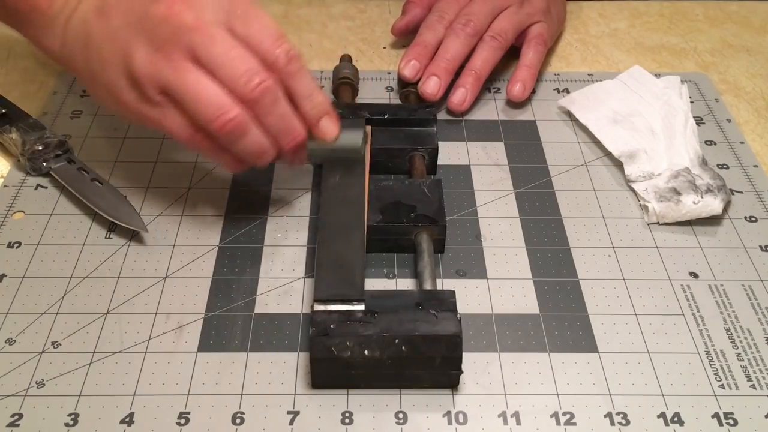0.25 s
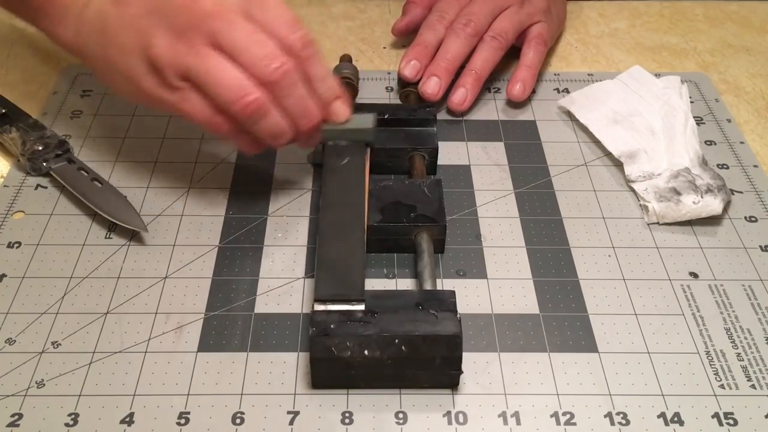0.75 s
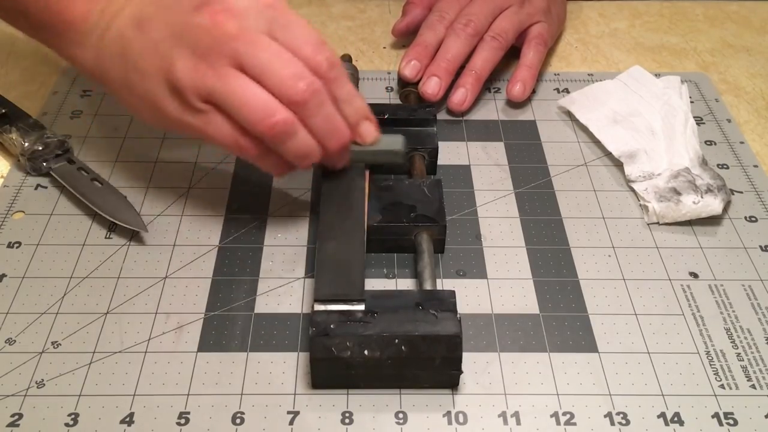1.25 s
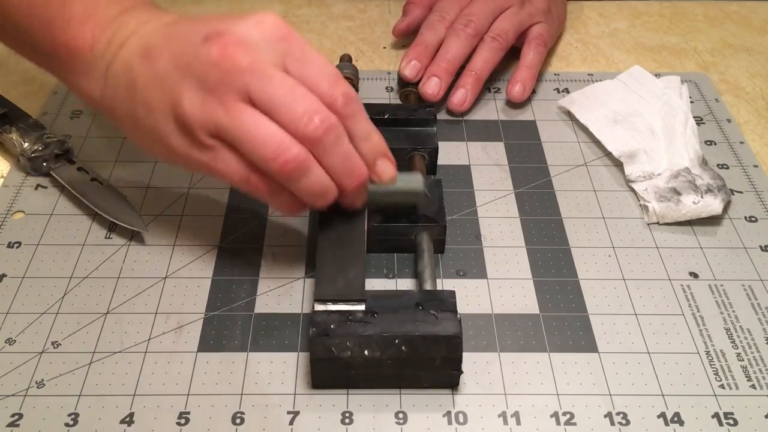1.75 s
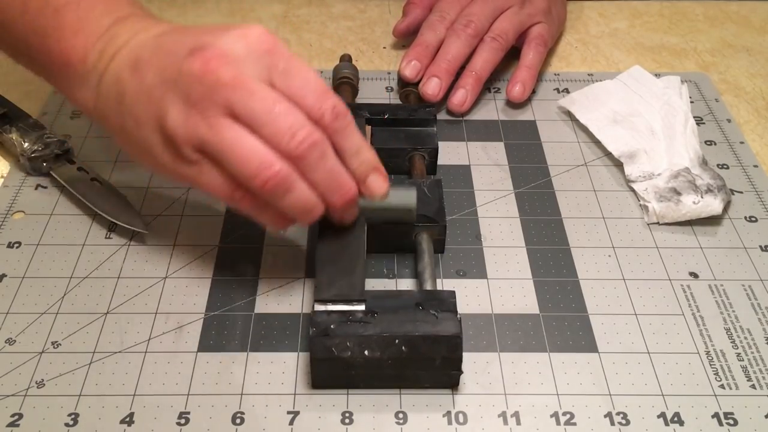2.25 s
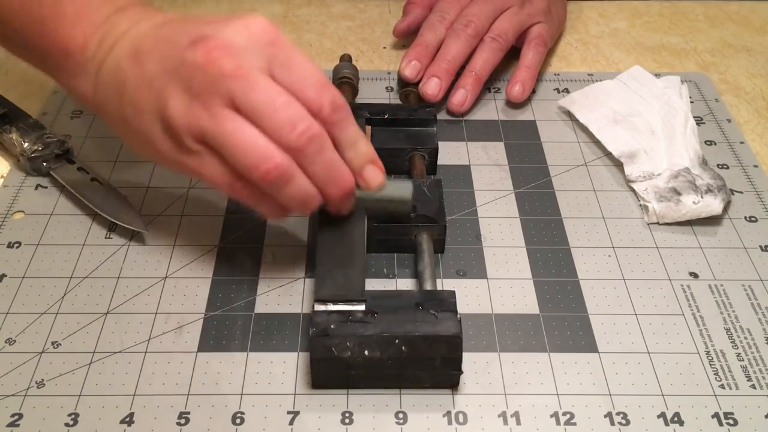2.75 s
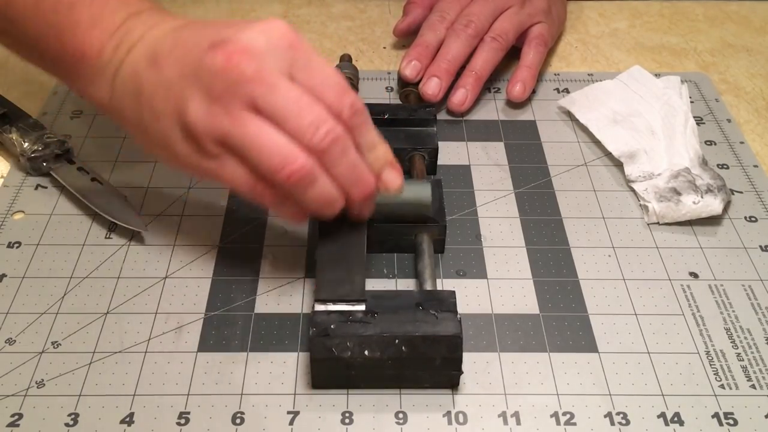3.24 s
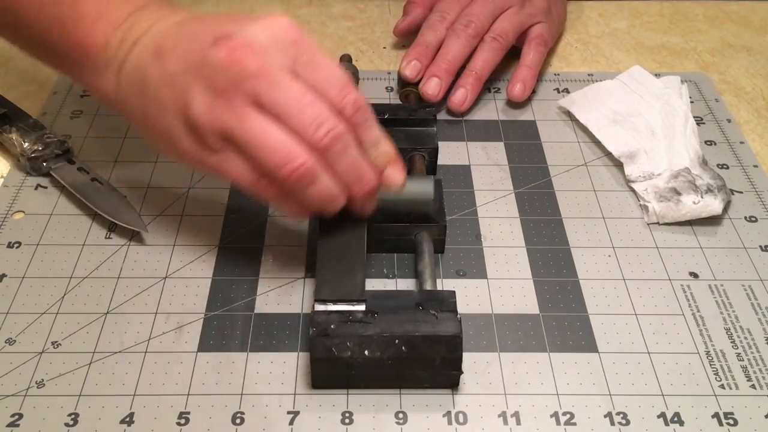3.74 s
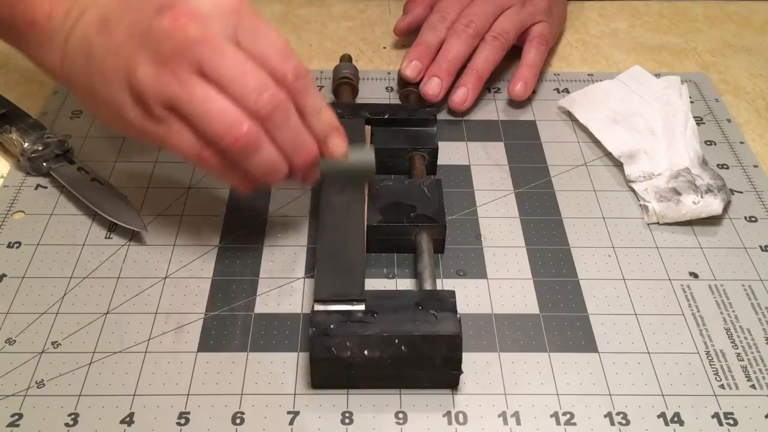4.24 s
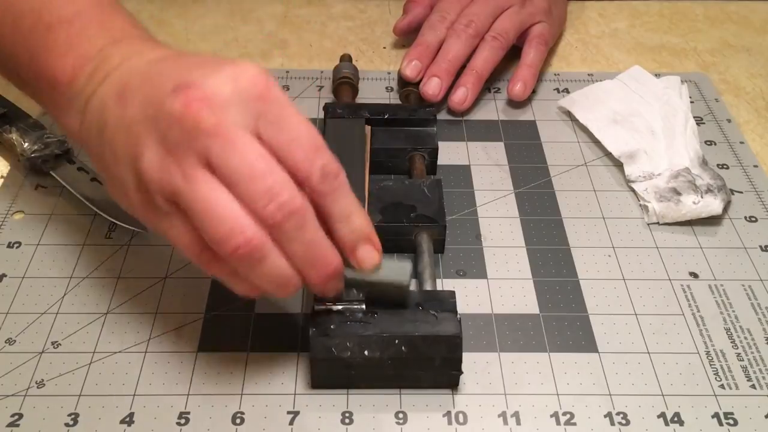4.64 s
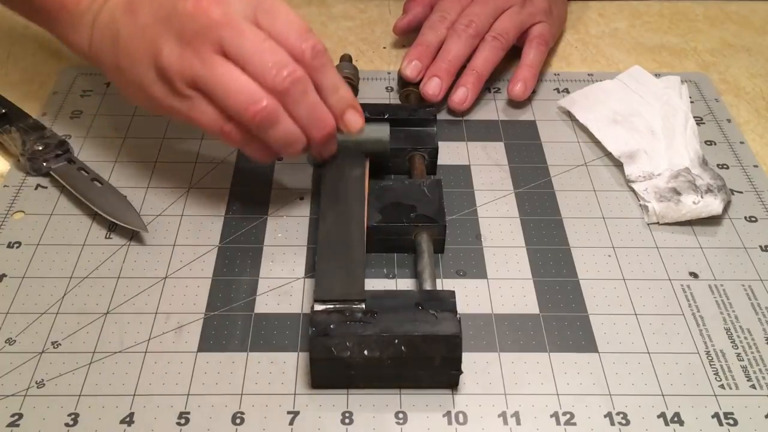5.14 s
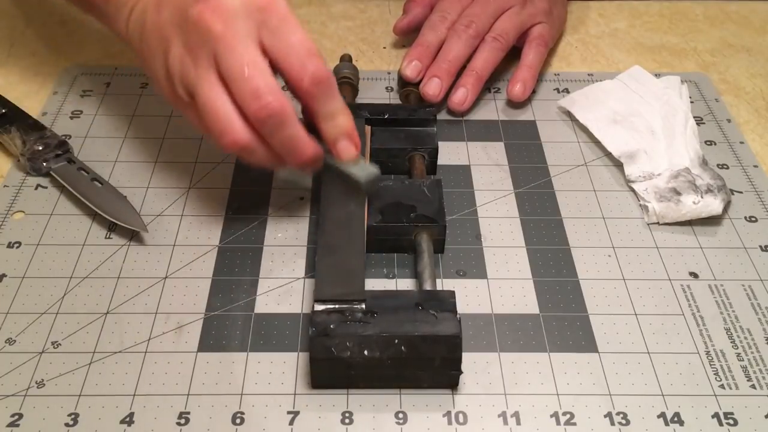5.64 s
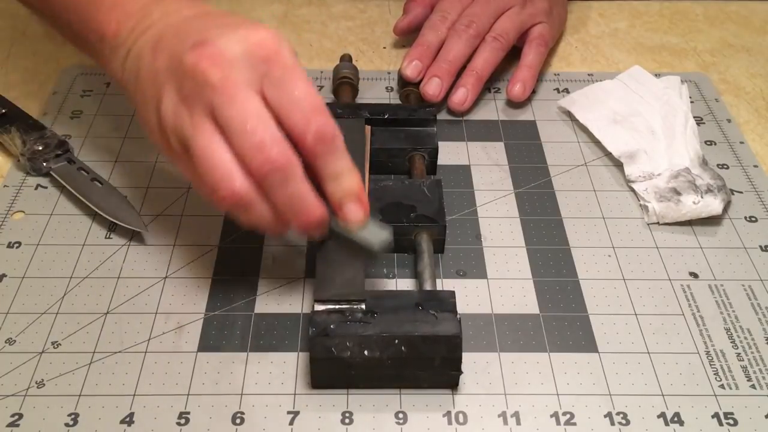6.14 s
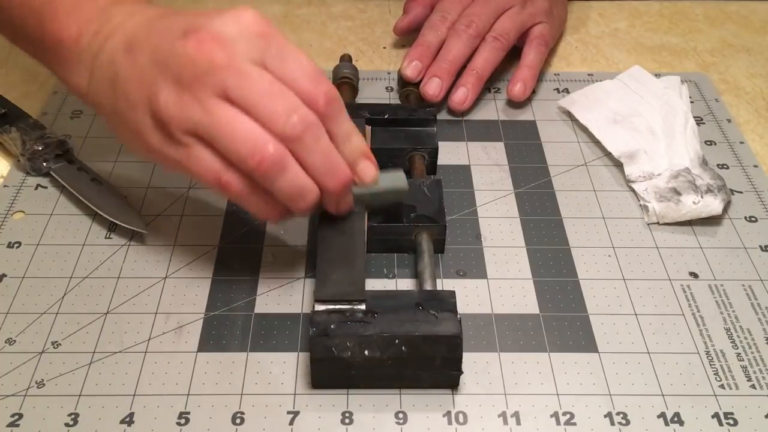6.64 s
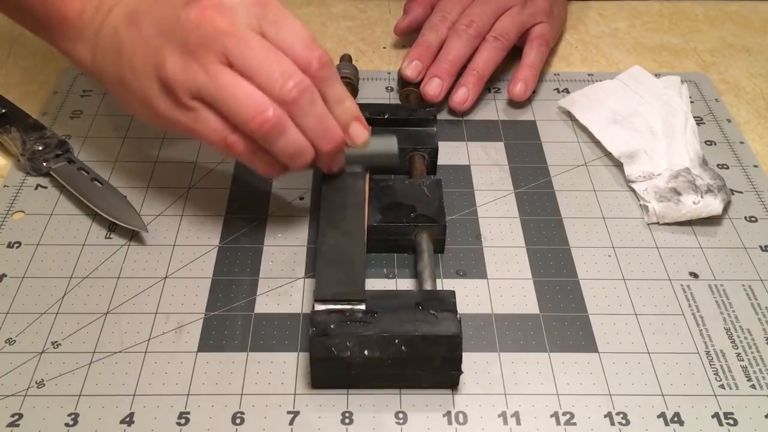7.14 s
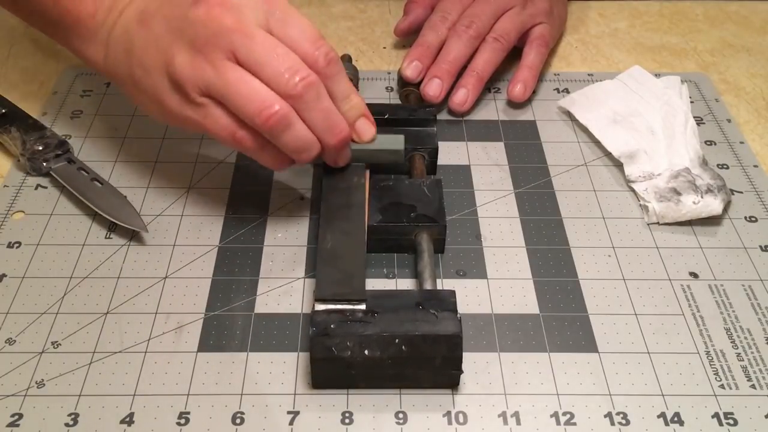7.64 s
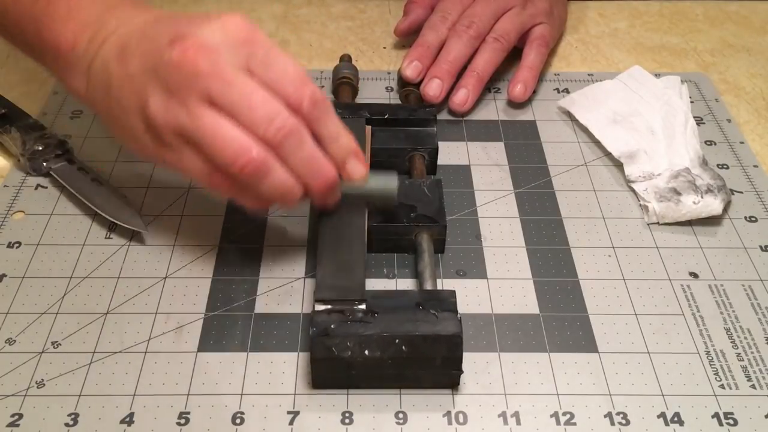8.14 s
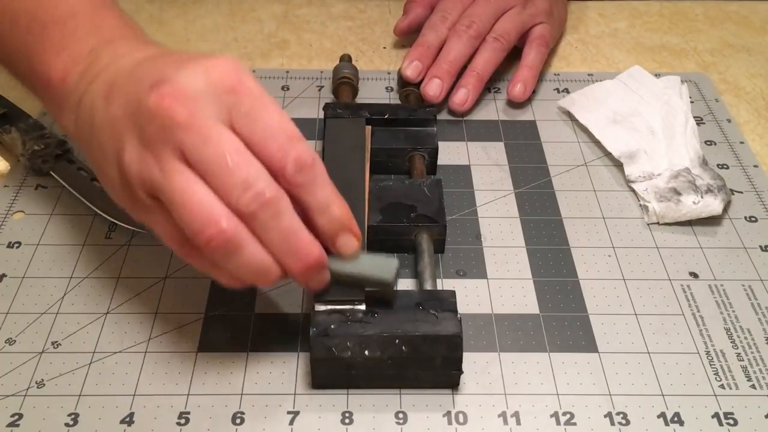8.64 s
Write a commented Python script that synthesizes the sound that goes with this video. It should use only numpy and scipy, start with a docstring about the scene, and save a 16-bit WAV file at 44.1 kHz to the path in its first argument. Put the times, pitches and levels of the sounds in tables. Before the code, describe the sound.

A small abrasive block scrubs a diamond sharpening stone clamped in a vise, a close, gritty hiss that runs for about nine seconds. For the first four seconds it circles in smooth, swelling strokes, about four a second, with a soft low shudder, a light tap at 0.4 seconds and a few faint swishes. From about 4.5 seconds it saws straight back and forth, around seven strokes a second, the rasp breaking briefly at each turn while the vise jolts and rumbles. Dull thuds on the desk come near 5.8 and 6.4 seconds, and the scrubbing grows slightly louder. From 7.3 seconds the block's edge digs in with short falling swishes. A sharp knock lands at 7.4 seconds, a softer one at 8.5 and the sharpest at 8.7, each with a low thud from the vise. Faint air of a small room lies underneath.

```python
"""A gritty, hissing scrub, stroke after stroke: a small abrasive block works over a diamond stone.
Breaking grains ring the block, the stone and the vise that holds it on a desk. The hand circles at
first, with a soft shudder, then saws straight to and fro, so the rasp stops and the vise jolts at
every turn. Now and then an edge digs in and swishes. Late on the block catches the end of the stone
and knocks, and the vise thuds on the desk. A small room and its faint air sit behind it all."""
import sys
import numpy as np
from scipy import signal
from scipy.fft import rfft, irfft, next_fast_len
from scipy.io import wavfile
from scipy.ndimage import uniform_filter1d

SR = 44100
rng = np.random.default_rng(int(sys.argv[2]) if len(sys.argv) > 2 else 0)


def generate_wav(sig):
    """Save sig (samples, or channels by samples) to the path in sys.argv[1] as 16-bit PCM at SR."""
    pcm = np.round(np.clip(np.atleast_2d(sig).T, -1, 1) * 32767).astype(np.int16)
    wavfile.write(sys.argv[1], SR, pcm)


N = 392034
TIME = np.arange(N) / SR


def scrubbing():
    """Grains break under the moving block: hiss, rasp and grating on top, the vise rumbling below."""
    judder = wander(rate_hz=65)  # the block skips on the grit, in all bands at once
    tremor = wander(rate_hz=14.5)  # the grip is never quite even
    contact = hiss(judder, tremor) + rasp(judder, tremor) + grating(judder)
    return travelling_contact(contact) + rumble(judder)


# tone of the finest grains: (frequency [Hz], level [dB])
HISS_SPECTRUM = [(1500, -37), (4000, -7), (5700, -5.5), (6600, -0.5), (8600, 0), (9400, 0), (11500, -2),
                 (13800, -8), (15800, -21)]
# long, fast sweeps brighten the hiss: (time [s], fizz lift [dB])
SWEEP_BRIGHTNESS = [(1.1, 3.5), (1.5, 3.5), (2.8, 7.5), (4.3, 4.5), (5.1, 4.5), (6.1, 8), (6.8, 1),
                    (7.3, -1.5), (7.7, -3), (8.2, 5), (8.6, 3.5)]

def hiss(judder, tremor, sag_db=3, trim_db=-1.77):
    """A dense spray of fine fractures that swells with hand speed and ducks as the hand turns."""
    sweep_db, = curves(SWEEP_BRIGHTNESS)
    _, dip_db = turns()
    stroke_db, bite_db = pressure(), bites()
    spray = grit(HISS_SPECTRUM, per_s=16000, spread_db=1.5, judder_db=0.36 * judder + 1.38 * tremor)
    spray *= gain_of(stroke_db + bite_db - 0.97 * dip_db - sag_db * (1 - hand_speed()) + trim_db)
    # a firm, fast stroke throws off more of the finest fizz
    fizz = signal.sosfiltfilt(signal.butter(2, 10000, "high", fs=SR, output="sos"), spray)
    fizz_db = 0.095 * (stroke_db - stroke_db.mean()) - 0.18 * dip_db + sweep_db + 0.36 * bite_db
    return spray + fizz * (gain_of(fizz_db) - 1)


# tone of the block's face on the stone: (frequency [Hz], level [dB])
RASP_SPECTRUM = [(900, -43), (2000, -3.5), (2900, -2.5), (3500, 5), (4400, 5), (5100, -3), (7000, -18.5),
                 (15000, -10.5)]
# the face rasps most when flat on the middle of the stone: (time [s], rasp gain [dB])
FACE_CONTACT = [(1.2, -12.5), (1.7, -10), (3.2, -9), (3.8, -12.5), (8.8, -12)]

def rasp(judder, tremor, slow_hz=3200, fast_hz=4300, sag_db=2, trim_db=0.08):
    """The face rasps over the grains; the faster they pass, the higher it sings."""
    face_db, = curves(FACE_CONTACT)
    turning, dip_db = turns()
    speed = hand_speed()
    grains = grit(RASP_SPECTRUM, per_s=7000, spread_db=1.0, judder_db=0.32 * judder + 0.41 * tremor)
    song = resonate(rng.standard_normal(N), slow_hz + (fast_hz - slow_hz) * speed ** 2, width_hz=840)
    song *= gain_of(-7.5 + 1.76 * (face_db - face_db.mean()))  # clearest when the face lies flat
    duck_db = 0.81 * dip_db + 4.6 * turning + sag_db * (1 - speed)
    return (grains + song) * gain_of(pressure() + face_db - duck_db + trim_db)


# tone of the block's edge on the stone: (frequency [Hz], level [dB])
GRATE_SPECTRUM = [(150, -1), (400, -2.5), (800, -0.5), (2100, 3.5), (2800, 3), (4000, -3), (10000, -11)]

def grating(judder, edge_db=-19, drag_db=-3, slow_lift_db=2, turn_duck_db=5):
    """The edge grates coarsely, more when it drags or moves slowly, and ducks at the turn itself."""
    turning, _ = turns()
    flicker_db = 0.4 * judder + 1.85 * wander(rate_hz=16)
    grains = grit(GRATE_SPECTRUM, per_s=3500, spread_db=1.5, judder_db=flicker_db)
    level = np.hypot(gain_of(pressure() + edge_db), gain_of(drag_db) * dragging())
    return grains * level * gain_of(slow_lift_db * (1 - hand_speed()) - turn_duck_db * turning)


def grit(spectrum, per_s, spread_db, judder_db):
    """Tiny fractures of abrasive grains, of uneven size and bunched by the judder, ring the body."""
    hits = rng.random(N) < per_s / SR
    sizes = gain_of(judder_db + spread_db * np.minimum(rng.exponential(1, N), 4))
    return unit_rms(body(hits * sizes * rng.choice([-1, 1], N), spectrum))


# resonances of vise, block, stone and holder: (frequency [Hz], width [Hz], lift [dB])
BODY_RESONANCES = [(111, 30, 0), (297, 32, 5.5), (394, 39, 8), (694, 86, 8.5), (1178, 183, 7),
                   (1487, 22, 8.5), (2310, 710, 6.5), (4500, 690, 3), (5260, 130, 5), (6850, 1800, 7.5),
                   (7600, 150, 4), (8090, 310, 5.5), (8490, 800, 7), (10470, 220, -5.5), (14900, 260, 13.5)]

def body(force, spectrum, size=4096):
    """Colours a force by its spectrum and lets the resonances ring after it."""
    hz = abs(np.fft.fftfreq(size, 1 / SR))
    peaks_db = sum(lift / (1 + (2 * (hz - f) / width) ** 2) for f, width, lift in BODY_RESONANCES)
    log_gain = np.log(gain_of(value_at(spectrum, hz) + peaks_db))
    response = np.fft.ifft(np.exp(np.conj(signal.hilbert(log_gain)))).real  # minimum phase
    return signal.oaconvolve(force, response[:size // 2])[:len(force)]


def travelling_contact(x, depth_db=3.0, patch_bins=4, patch_frames=20):
    """As the contact point travels, it feeds now some resonances, now others."""
    bands = signal.stft(x, nperseg=256, noverlap=192)[2]
    patches = uniform_filter1d(rng.standard_normal(bands.shape), patch_bins, axis=0)
    patches = uniform_filter1d(patches, patch_frames, axis=1)
    return signal.istft(bands * gain_of(depth_db * unit_rms(patches)), nperseg=256, noverlap=192)[1][:N]


# one push or pull of the block, lasting until the next: (start [s], level [dB])
HAND_STROKES = [(0.0, -34.5), (0.2, -35.5), (0.371, -35), (0.663, -38), (0.81, -35), (0.991, -38),
                (1.192, -37), (1.4, -36.5), (1.6, -36.0), (1.846, -37.5), (2.11, -38), (2.363, -37.5),
                (2.615, -39), (2.858, -38), (3.101, -37.5), (3.36, -36.5), (3.588, -35.5), (3.869, -36),
                (4.134, -33), (4.298, -36.5), (4.469, -37), (4.627, -34.5), (4.785, -36), (4.934, -35),
                (5.091, -35.0), (5.239, -35.5), (5.389, -36), (5.534, -34.5), (5.671, -35), (5.806, -35),
                (5.941, -35.5), (6.082, -35.5), (6.227, -34.5), (6.375, -34.5), (6.518, -36), (6.664, -33),
                (6.79, -32), (6.924, -33.5), (7.053, -33.5), (7.183, -33.5), (7.304, -34), (7.42, -33),
                (7.542, -34.5), (7.663, -34), (7.778, -33), (7.907, -35), (8.162, -33.5), (8.338, -36.5),
                (8.523, -34), (8.672, -36), (8.815, -32.5)]

def pressure(fade_db_per_s=7, ease_s=0.045):
    """The scrub's level in dB: the hand eases off through each stroke and blends into the next."""
    starts, db = np.transpose(HAND_STROKES)
    stroke = np.maximum(np.searchsorted(starts, TIME, "right") - 1, 0)
    age = TIME - starts[stroke]
    return uniform_filter1d(db[stroke] - fade_db_per_s * (age - age.mean()), round(ease_s * SR))


def hand_speed():
    """The swing of the hand: 0 at each turn, 1 at mid-stroke."""
    starts = np.sort([s for s, _ in HAND_STROKES])
    return abs(np.sin(np.pi * np.interp(TIME, starts, np.arange(len(starts)))))


# turns get deeper and quicker as circling becomes sawing: (time [s], depth [dB], half duration [s])
TURN_SHAPES = [(1.0, -1.5, 0.026), (2.6, 0.5, 0.017), (3.2, 2.5, 0.045), (4.1, 2.5, 0.017),
               (4.6, 12, 0.0033), (4.8, 14, 0.0092), (6.6, 21, 0.006), (7.15, 8.5, 0.016), (7.3, 22, .014),
               (7.8, 32, 0.013), (8.2, 15, 0.016), (8.8, 23, 0.018)]

def turns(lean=0.13):
    """The hand reverses: how far it is into a turn (0-1), and the dip in dB that drives the ducking."""
    turning, dip_db = np.zeros(N), np.zeros(N)
    when, depths_db, halves_s = np.transpose(TURN_SHAPES)
    for s, _ in HAND_STROKES:
        half_s = np.interp(s, when, halves_s)
        near = abs(TIME - s) < .5
        # the block coasts to a stop and bites again more quickly
        since = TIME[near] - s - lean * half_s / 2
        width_s = half_s * np.exp(-lean * np.sign(since))
        bell = np.exp(-(since / width_s) ** 2)
        turning[near] += bell
        dip_db[near] += np.interp(s, when, depths_db) * bell
    return turning, dip_db


# flares in the hiss: (start [s], length [s], lift [dB])
HARD_BITES = [(4.018, 0.089, 3.5), (6.84, 0.067, 1.5), (7.366, 0.029, 7), (8.553, 0.076, 2.5)]

def bites():
    """The block bites harder for a moment, lifting and brightening the hiss; in dB."""
    lift_db = np.zeros(N)
    for s, length, db in HARD_BITES:
        add(lift_db, s, db * drag_shape(round(length * SR)))
    return lift_db


# an edge digs in and drags: (start [s], length [s], level [dB], start pitch [Hz], end pitch [Hz])
EDGE_DRAGS = [(0.03, 0.098, -50, 4400, 3470), (0.48, 0.16, -52, 4170, 2400),
              (1.009, .12, -49.5, 3750, 1390), (1.031, 0.14, -54, 520, 400),
              (6.905, 0.029, -50.5, 746, 500), (7.31, 0.088, -43, 2550, 1280),
              (7.551, 0.11, -46.5, 2900, 1960), (7.785, 0.11, -46, 2640, 1740),
              (7.396, 0.025, -41.5, 715, 557), (8.498, 0.024, -42.5, 776, 547),
              (8.545, 0.093, -44.5, 4020, 2450), (8.689, 0.18, -51, 2600, 2100)]

def swishes():
    """A dragging edge rasps in one band, which sinks as it slows."""
    out = np.zeros(N)
    for s, length, db, start_hz, end_hz in EDGE_DRAGS:
        count = round(length * SR)
        glide_hz = np.geomspace(start_hz, end_hz, count)
        band = resonate(rng.standard_normal(count), glide_hz, width_hz=420 + 0.45 * end_hz)
        add(out, s, gain_of(db) * band * drag_shape(count))
    return out


def dragging():
    """How hard an edge is digging in, as an amplitude."""
    out = np.zeros(N)
    for s, length, db, _, _ in EDGE_DRAGS:
        add(out, s, gain_of(db) * drag_shape(round(length * SR)))
    return out


def drag_shape(count, attack=0.073, release=0.31):
    """A drag bites fast and lets go slowly; attack and release are shares of its length."""
    along = np.linspace(0, 1, count)
    return np.minimum(1, np.minimum(along / attack, (1 - along) / release))


# the block strikes the holder: (time [s], peak [dB], hardness as a low-pass corner [Hz])
BLOCK_KNOCKS = [(.388, -27.5, 3000), (7.396, -15.5, 3530), (8.497, -21, 1350), (8.6909, -13, 4280)]
# tone of a knock: (frequency [Hz], level [dB])
CLACK_SPECTRUM = [(60, -22), (350, 4), (800, -9.5), (2050, -2.5), (2900, -6.5), (3900, 1), (16000, -25)]

def knocks(chatter_s=0.0062, chatter_gain=0.12):
    """A sharp blow and a few milliseconds of chatter; a soft blow has less treble."""
    out, t = np.zeros(N), np.arange(SR // 8) / SR
    for s, db, corner_hz in BLOCK_KNOCKS:
        blow = 2 * (t == 0)
        chatter = chatter_gain * rng.standard_normal(len(t)) * np.exp(-t / chatter_s)
        force = signal.sosfilt(signal.butter(2, corner_hz, fs=SR, output="sos"), blow + chatter)
        clack = body(force, CLACK_SPECTRUM)
        add(out, s, gain_of(db) * clack / abs(clack).max())
    return out


# the vise rocks on the desk: (time [s], peak [dB], pitch [ratio])
VISE_THUDS = [(5.824, -30, 0.7), (6.385, -32.5, 0.97), (6.93, -37, 1.1), (7.37, -31, 0.97),
              (7.395, -20.5, 1.077), (7.875, -29, 1.076), (7.925, -32, 1), (8.504, -27.5, 0.89),
              (8.561, -26.5, 1.05), (8.652, -33, 1.2), (8.697, -23.5, 1)]
# modes of the vise on the desk: (frequency [Hz], level [dB], t60 [s])
VISE_MODES = [(66.6, -18, 0.32), (114.4, 8, 0.069), (162.3, -3, 0.14), (286, 0, 0.09), (380, 1.5, 0.051)]

def thuds(rise_s=0.0018, jolt_pitch=0.707):
    """The heavy vise answers each rock or jolt with a few damped low modes."""
    out, t = np.zeros(N), np.arange(SR // 4) / SR
    for s, db, pitch in VISE_THUDS + [(s, db, jolt_pitch) for s, db in jolts()]:
        ring = sum(gain_of(mode_db - 60 * t / t60) * np.sin(2 * np.pi * hz * pitch * t)
                   for hz, mode_db, t60 in VISE_MODES)
        ring *= 1 - np.exp(-t / rise_s)
        add(out, s, gain_of(db) * ring / abs(ring).max())
    return out


# weight of the jolt that starts a push: (time [s], peak [dB])
JOLT_LEVELS = [(4.6, -47), (4.78, -37.5), (6.5, -36), (7.002, -45), (8.8, -40.5)]

def jolts(pull_db=-5.5):
    """Each straight turn jolts the vise, a pull less than a push; gives (time [s], peak [dB])."""
    when, db = np.transpose(JOLT_LEVELS)
    return [(s, np.interp(s, when, db) + pull_db * (k % 2))
            for k, (s, _) in enumerate(HAND_STROKES) if s > when[0]]


# deep tone of the jolted vise: (frequency [Hz], level [dB])
SHAKE_SPECTRUM = [(25, -13), (52, 10), (80, 0.5), (155, -1), (230, -15.5), (400, -18.5), (600, -28.5),
                  (4000, -55)]

def shaking(rise_s=0.015, decay_s=0.023, trim_db=-3.5):
    """After each jolt the vise shakes and settles."""
    level, t = np.zeros(N), np.arange(SR // 3) / SR
    swell = (1 - np.exp(-t / rise_s)) * np.exp(-t / decay_s)
    for s, db in jolts():
        add(level, s, gain_of(db + trim_db) * swell / swell.max())
    return level * grit(SHAKE_SPECTRUM, per_s=1500, spread_db=1.0, judder_db=0)


# tone of the vise's steady rumble: (frequency [Hz], level [dB])
RUMBLE_SPECTRUM = [(28, -31), (52, 4.5), (95, 1), (160, 0), (205, -9), (290, -6), (400, -11), (520, -24),
                   (4000, -45.5)]

def rumble(judder, scrub_db=-18.5, drag_db=-1, sag_db=0.5):
    """The vise rumbles in step with the strokes, and harder under a dragging edge."""
    grains = grit(RUMBLE_SPECTRUM, per_s=1500, spread_db=2.0, judder_db=0.24 * judder)
    steady = gain_of(pressure() + scrub_db - sag_db * (1 - hand_speed()))
    return grains * np.hypot(steady, gain_of(drag_db) * dragging())


# the block shudders in the fingers, mostly while circling: (time [s], mid-stroke level [dB])
SHUDDER_LEVELS = [(1.2, -57), (1.75, -50), (2.3, -51.5), (3.3, -48), (4.0, -47.5), (4.8, -61.5)]

def shudder(slow_hz=85, fast_hz=152, jitter_hz=14, octave_db=-8, sag_db=13, uneven_db=5.5):
    """A soft stick-slip flutter that swells and rises with hand speed."""
    level_db, = curves(SHUDDER_LEVELS)
    speed = hand_speed()
    hz = slow_hz + (fast_hz - slow_hz) * speed ** 2 + jitter_hz * wander(rate_hz=66)
    phase = 2 * np.pi * np.cumsum(hz) / SR
    root, octave = (np.sin(k * phase) * gain_of(uneven_db * wander(rate_hz=33)) for k in (1, 2))
    return gain_of(level_db - sag_db * (1 - speed)) * unit_rms(root + gain_of(octave_db) * octave)


# decay of the small room: (frequency [Hz], t60 [s])
ROOM_DECAY = [(100, 0.41), (15000, 0.036)]

def room(x, near_db=-13, near_s=0.009, tail_db=-17, taps_per_s=3000):
    """Quick reflections from desk and vise, then the faint tail of the room."""
    t = np.arange(SR // 3) / SR
    taps = rng.choice([-1, 1], len(t)) * (rng.random(len(t)) < taps_per_s / SR) * (t > .001)
    near = taps * np.exp(-t / near_s)
    hz, when, bands = signal.stft(rng.permutation(taps) * (t > .008), SR, nperseg=256)
    decay = gain_of(-60 * when / value_at(ROOM_DECAY, hz)[:, None])
    tail = signal.istft(bands * decay, SR, nperseg=256)[1][:len(t)]
    echoes = gain_of(near_db) * near / np.linalg.norm(near)
    echoes += gain_of(tail_db) * tail / np.linalg.norm(tail)
    return x + signal.oaconvolve(x, echoes)[:N]


# room tone: (frequency [Hz], level [dB])
AIR_SPECTRUM = [(25, -17), (60, -8), (130, -4), (900, -20), (16000, -12.5)]

def room_air(level_db=-56):
    """The air of the room murmurs under it all."""
    return gain_of(level_db) * noise(lambda hz: gain_of(value_at(AIR_SPECTRUM, hz)))


def resonate(x, hz, width_hz):
    """A resonance whose centre follows the curve hz."""
    carrier = np.exp(2j * np.pi * np.cumsum(hz) / SR)
    pole = np.exp(-np.pi * width_hz / SR)
    return unit_rms((carrier * signal.lfilter([1], [1, -2 * pole, pole * pole], x / carrier)).real)


def noise(colour):
    """Noise of rms 1 whose amplitude spectrum is colour(Hz)."""
    size = next_fast_len(N, True)
    white = rfft(rng.standard_normal(size))
    return unit_rms(irfft(white * colour(np.fft.rfftfreq(size, 1 / SR)), size)[:N])


def wander(rate_hz):
    """Random drift of rms 1, rolling off above the given rate."""
    return noise(lambda hz: hz / (hz + rate_hz / 10) / (1 + (hz / rate_hz) ** 2))


def gain_of(db):
    """Decibels to amplitude."""
    return 10 ** (np.asarray(db) / 20)


def unit_rms(x):
    """Scales to rms 1."""
    return x / np.sqrt(np.mean(x ** 2) + 1e-20)


def value_at(points, hz):
    """Reads a table on a log-frequency axis."""
    f, value = np.transpose(points)
    return np.interp(np.log(hz + 1), np.log(f + 1), value)


def curves(rows):
    """One value a sample for each column of a timed table."""
    s, *columns = np.transpose(rows)
    return [np.interp(TIME, s, c) for c in columns]


def add(mix, s, sound):
    """Mixes a sound in at time s."""
    part = mix[round(s * SR):][:len(sound)]
    part += sound[:len(part)]


def scene():
    """Block, stone and vise close up in the room, the same in both channels."""
    air = room_air()
    mono = room(scrubbing() + shudder() + shaking() + swishes() + knocks() + thuds()) + air
    return np.array([mono, mono])


def record(dry):
    """A bass cut and a steep limit on the top end."""
    low_cut_hz, high_cut_hz = 36, 15850
    trimmed = signal.sosfilt(signal.butter(4, low_cut_hz, "high", fs=SR, output="sos"), dry)
    low_pass = signal.firwin(511, high_cut_hz, window=("kaiser", 9), fs=SR)
    return signal.oaconvolve(trimmed, low_pass[None], "same")


dry = scene()
out = record(dry)
generate_wav(out)
```